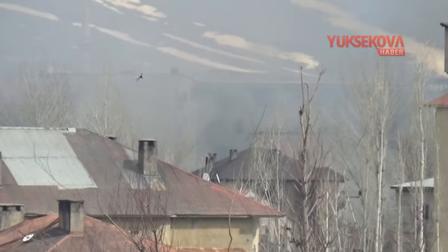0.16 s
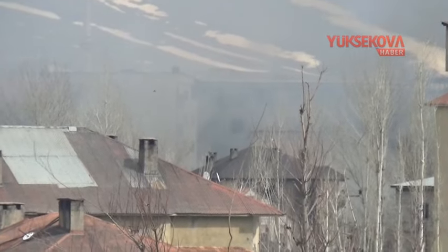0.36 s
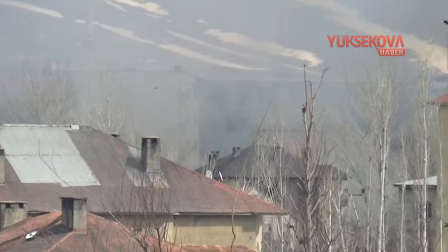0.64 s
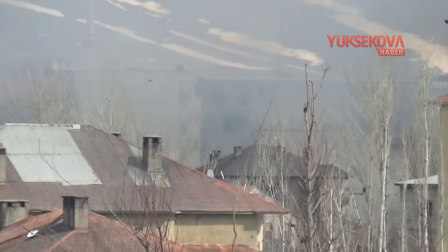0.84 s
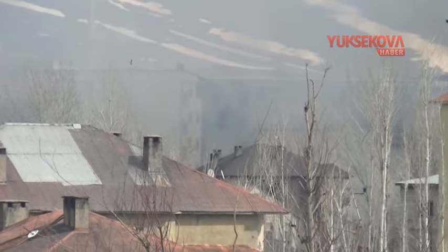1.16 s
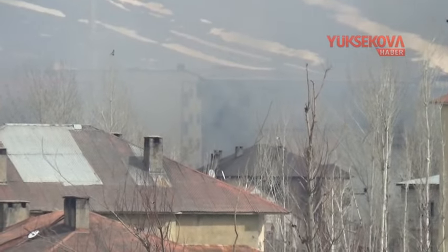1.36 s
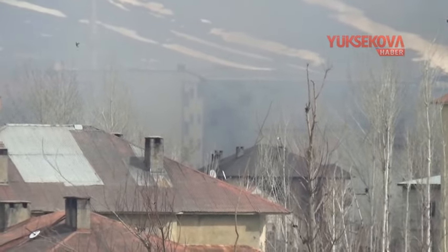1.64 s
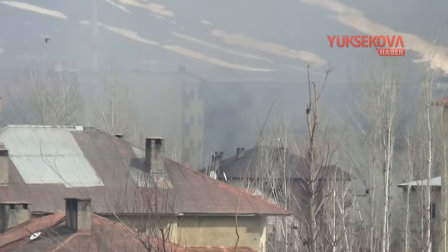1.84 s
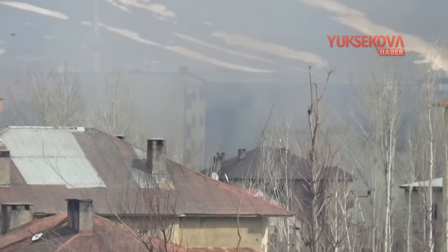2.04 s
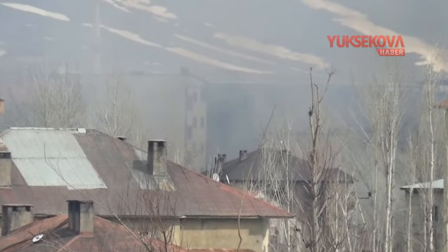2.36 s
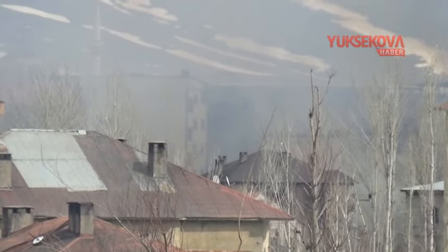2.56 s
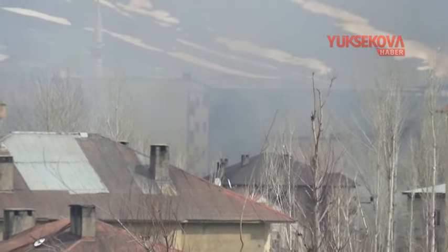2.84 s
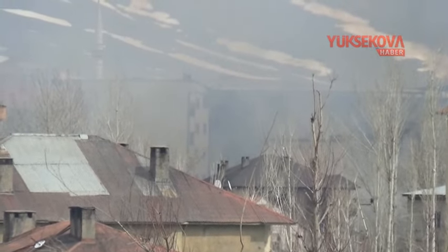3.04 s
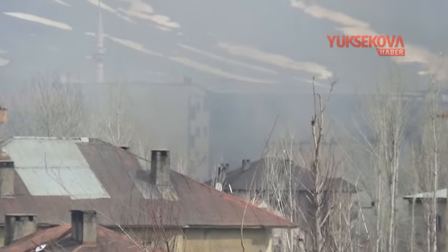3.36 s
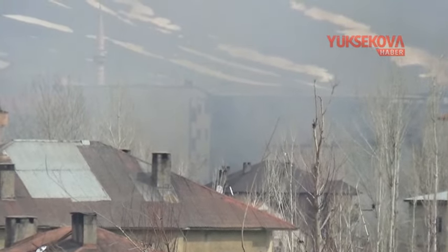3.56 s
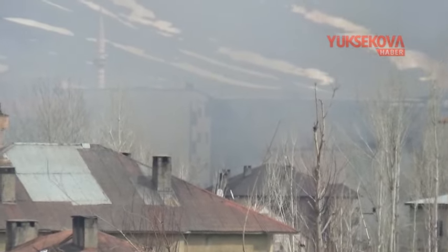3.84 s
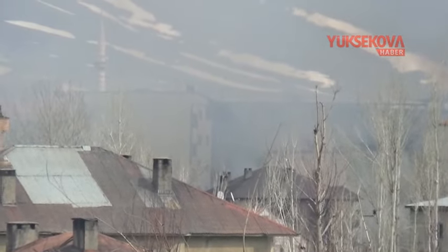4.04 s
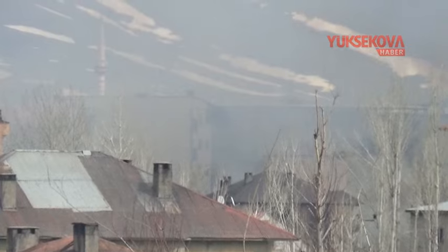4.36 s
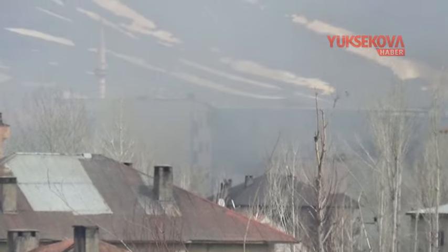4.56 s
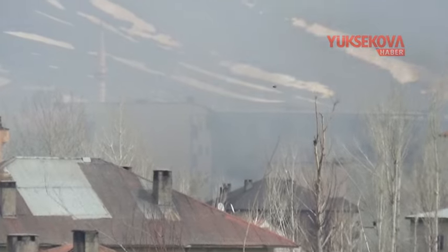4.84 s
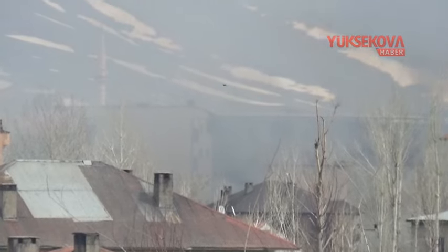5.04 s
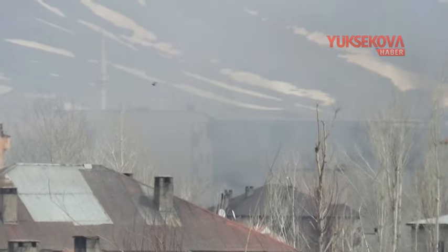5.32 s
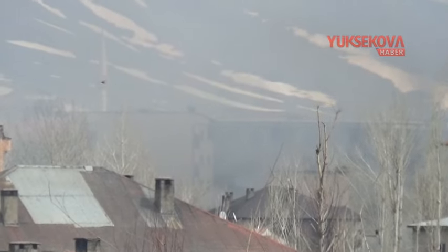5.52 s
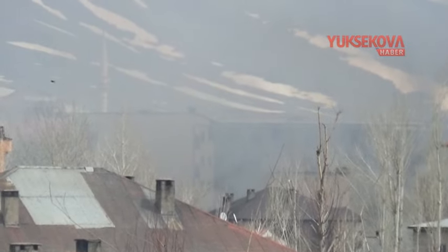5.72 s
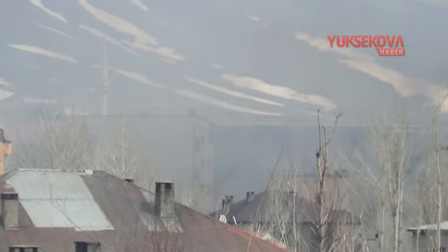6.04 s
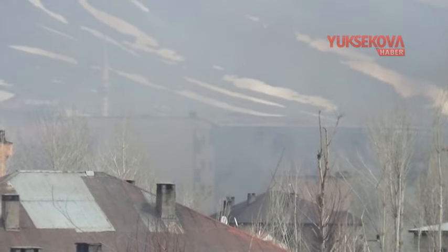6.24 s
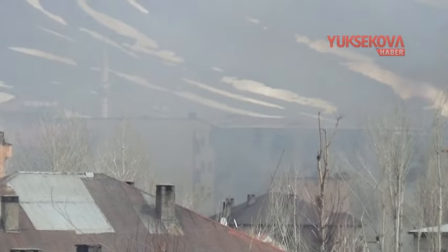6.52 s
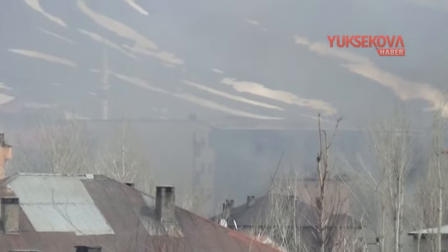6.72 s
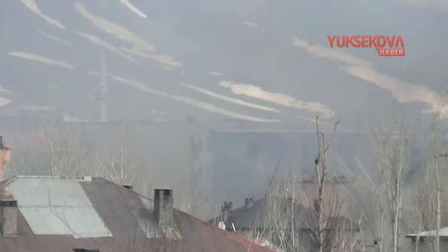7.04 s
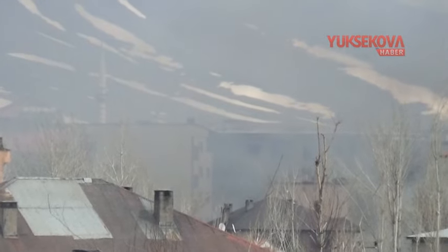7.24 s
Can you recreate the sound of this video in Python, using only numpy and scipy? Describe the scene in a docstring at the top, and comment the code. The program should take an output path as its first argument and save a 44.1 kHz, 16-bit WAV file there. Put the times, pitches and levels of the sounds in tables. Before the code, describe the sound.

The first second holds only a faint low town hum and steady hiss, with a couple of tiny dry clicks at about 0.2 to 0.3 s. At 1.15 s a heavy explosion strikes from some distance: a rapid chain of hard, low booms and wall echoes until about 2 s, with a brief overloaded crackle at 1.4 s. A thick, clattering roll over deep rumble spreads through the town and fades through 3.5 s, with soft late echoes. At 3.83 s a weaker, duller blast thuds several times and rolls away. At 5.34 s a stronger group of booms hits until 5.6 s, followed by lesser thuds around 6.05 and 6.3 s. A last boom lands at 7.3 s and is still rolling at the end. Close walls give a boxy colour, the left is louder, and the loudest peaks are compressed.

```python
"""Heavy explosions boom across a town, some way from the microphones, over a faint hum and hiss.
Each shock front is a sharp step with a cluster of random wall reflections and a softer, duller tail.
Houses and hillsides answer with long rolls: dense echoes of noise over a deep rumble.
A few short bursts of noise make small clicks. Close walls colour everything, the left side is louder,
and loud sound is turned down, with any peaks left beyond full scale cut flat."""
import sys
import numpy as np
from scipy import signal
from scipy.fft import rfft, irfft
from scipy.io import wavfile
from scipy.ndimage import uniform_filter1d

SR = 44100
rng = np.random.default_rng(int(sys.argv[2]) if len(sys.argv) > 2 else 0)


def unload_audio(sound):
    """Save the sound as a 16-bit wav file, at the path given as the first command line argument."""
    columns = np.transpose(np.atleast_2d(sound))
    # keep every value between -1 and 1, then stretch to whole-number steps
    steps = np.round(np.clip(columns, -1, 1) * 32767)
    wavfile.write(sys.argv[1], SR, steps.astype(np.int16))


N = 325458  # length in samples
SIZE = 8192  # length in samples of the spectra used for filtering
HZ = np.fft.rfftfreq(SIZE, 1 / SR)


def amp(db):
    """Turns decibels into a gain."""
    return 10 ** (np.asarray(db) / 20)


def unit(x):
    """Scales a sound to an rms of 1."""
    return x / np.sqrt(np.mean(x ** 2) + 1e-20)


def die_away(t, t60):
    """A gain that falls by 60 dB in t60 seconds."""
    return np.exp(-np.log(1000) * t / t60)


def read(points):
    """Joins the points of a spectrum by straight lines over log frequency."""
    hz, db = np.transpose(points)
    return np.interp(np.log(HZ + 1), np.log(hz + 1), db)


def shelf(hz):
    """Rises from 0 well below hz to 1 well above it."""
    return HZ ** 4 / (HZ ** 4 + hz ** 4)


def band(hz, octaves):
    """A flat-topped band around hz, in dB."""
    distance = np.log2((HZ + 1) / hz) / octaves
    return -20 * np.log10(1 + distance ** 4)


def add(mix, s, sound):
    """Mixes a sound in at s seconds."""
    part = mix[..., round(s * SR):][..., :sound.shape[-1]]
    part += sound[..., :part.shape[-1]]


def colour(x, db):
    """Filters with the given dB at each frequency, so that nothing rings before a hit."""
    # folding the cepstrum forward in time gives a minimum-phase filter
    cepstrum = irfft(np.log(amp(np.maximum(db, db.max() - 100))))
    cepstrum[1:SIZE // 2] *= 2
    cepstrum[SIZE // 2 + 1:] = 0
    response = irfft(np.exp(rfft(cepstrum)))[:SIZE // 2]
    return signal.oaconvolve(x, response)[:len(x)]


def echoes(count, per_s, spread_db):
    """A random train of reflections of either sign; spread_db sets how unequal they are."""
    chance, size, sign = rng.random((3, count))
    strength = amp(spread_db * np.minimum(-np.log(1 - size), 3))
    return unit((chance < per_s / SR) * np.sign(sign - .5) * strength)


# Spectrum of the town hum and the hiss.
# Each row: frequency in Hz, relative strength in dB per Hz.
AIR_SPECTRUM = [(35, -6), (65, -3), (100, 1.5), (170, -4), (250, -1), (370, -8), (520, -7.5), (700, -10.5),
                (900, -12.5), (1030, -5), (1200, -14.5), (1550, -14.5), (2000, -20.5), (4000, -21.5),
                (6300, -20), (10000, -25), (14000, -25)]


def air(level_db=-53.5, left_db=2.0, right_db=-1.5, apart=.55):
    """Low hum of the town and a steady hiss: filtered noise, mostly shared by both microphones."""
    shared, left, right = (unit(colour(rng.standard_normal(N), read(AIR_SPECTRUM))) for _ in range(3))
    on_left = amp(left_db) * unit(shared + apart * left)
    on_right = amp(right_db) * unit(shared + apart * right)
    return amp(level_db) * np.array([on_left, on_right])


# Small clicks: most are close to the microphones; the one at 1.409 is a bright crackle of overload.
# Each row: start in seconds, peak in dB before the microphones, centre in Hz, width in octaves,
# time to fall by 60 dB in seconds.
CLICK_EVENTS = [(.192, -40, 2480, 1.7, 0.013), (.207, -37.5, 2450, 0.68, .025),
                (.330, -40, 2440, 0.63, 0.016), (1.409, -26, 7740, 0.61, 0.013),
                (3.926, -40.5, 4950, 1.13, 0.01), (4.106, -45, 3000, 1.1, .015),
                (5.857, -41.5, 3000, 1.4, .015)]


def clicks():
    """Tiny dry snaps and one crackle: short bursts of noise kept to one band."""
    out, t = np.zeros(N), np.arange(SIZE) / SR
    for s, db, hz, octaves, t60 in CLICK_EVENTS:
        burst = rng.standard_normal(SIZE) * die_away(t, t60)
        snap = colour(burst, band(hz, octaves))
        add(out, s, amp(db) * snap / abs(snap).max())
    return out


# The broad colour that all the blasts share.
# Each row: frequency in Hz, relative strength in dB per Hz.
BLAST_SPECTRUM = [(25, -45), (70, -21), (140, -5.5), (250, -5), (450, -7), (800, -12), (1100, -20.5),
                  (1600, -32.5), (2100, -42.5), (2800, -58.5), (3500, -67), (4300, -87), (9000, -100)]


def blast(db, rise_s, t60, boom_hz, boom_db, thud_db, crack_db,
          tail_t60=0.84, tail_db=-4, boom_octaves=0.18, thud_hz=190, crack_hz=1200,
          absorbed_db=12, absorbed_hz=2400, front=0.47, front_lost_s=0.0043):
    """A shock front, its cluster of wall reflections and a softer tail, dulled by distance."""
    t = np.arange(SR) / SR
    cluster = unit(echoes(SR, per_s=1600, spread_db=0.5) * die_away(t, t60))
    tail = unit(echoes(SR, per_s=4200, spread_db=1.0) * die_away(t, tail_t60))
    tail = colour(tail, -absorbed_db * shelf(absorbed_hz))  # longer paths lose more treble
    # rough or distant walls smear an arrival, so that it swells up instead of striking
    train = (cluster + amp(tail_db) * tail) * np.minimum(t / rise_s, 1) ** 2
    # the sharp front itself: a slow rise smears it away
    train[0] += front * np.exp(-rise_s / front_lost_s) * np.sqrt(SR)
    # the reflections spread the energy in time but leave the broad colour to the blast itself
    power = uniform_filter1d(abs(rfft(train[:SIZE])) ** 2, size=21)
    broad_db = 10 * np.log10(power + 1e-9)
    boom = boom_db * np.exp(-.5 * (np.log2((HZ + 1) / boom_hz) / boom_octaves) ** 2)
    tilt = thud_db * (1 - shelf(thud_hz)) + crack_db * shelf(crack_hz)
    sound = colour(train, read(BLAST_SPECTRUM) + boom + tilt - broad_db)
    return amp(db) * unit(sound) * np.sqrt(.02)  # the level counts the energy as if within 20 ms


# The shock fronts and their distinct echoes.
# Each row: start in seconds, level in dB before the microphones, rise in seconds,
# time for the cluster to fall by 60 dB in seconds, boom centre in Hz, boom boost in dB,
# boost of the low thud in dB, boost of the high crack in dB.
BLAST_EVENTS = [(1.150, -7.5, 0.0014, 0.43, 252, 4, -5, 3.5), (1.180, -9.5, .001, 0.13, 230, 8, -1.5, 3),
                (1.214, -5.5, 0.0035, 0.49, 235.6, 9.5, -0.5, -2),
                (1.253, -7.5, 0.00083, 0.26, 240, 0, -5, 1.5), (1.319, -8, 0.0034, 0.37, 239, 11.5, 4, 8.5),
                (1.370, -10.5, 0.0012, 0.28, 230, 8.5, -1.5, 9.5),
                (1.488, -16, .0005, .09, 300, 0, -3.5, 8), (1.628, -12, 0.00096, 0.12, 285.3, 1.5, -3, -6),
                (1.658, -10, 0.0024, 0.21, 169, 13.5, 3, 0),
                (1.766, -10.5, 0.00055, 0.048, 249, 6, -2.5, -9),
                (1.796, -13.5, 0.0012, 0.12, 235, 6, -1, -1), (1.863, -14, .001, .09, 199, 16, 5, -3.5),
                (1.980, -9, 0.02, .2, 254, 6.5, 10.5, 9), (2.605, -25, 0.012, 0.12, 700, -4, -8, 1),
                (3.010, -25.5, 0.012, 0.53, 260, -0.5, -2, -13),
                (3.355, -34.5, .001, 0.043, 397, 16, -11, -10.5), (3.405, -25, 0.038, 0.45, 910, 9, -9, 4),
                (3.496, -20.5, 0.0043, .075, 363, 9.5, -9, -11),
                (3.834, -14, 0.0016, 0.085, 383, 6, -2.5, -2),
                (3.876, -18.5, 0.0017, 0.73, 268, 11.5, 8.5, 8.5),
                (3.960, -18.5, 0.0042, .12, 274, 14.5, -7, 2),
                (3.995, -17.5, 0.0012, 0.12, 280, 9.5, -6, -1),
                (4.003, -17, 0.00048, 0.085, 273, 13.5, 5, 4), (4.010, -21, 0.00078, 0.24, 800, 8, 6.5, 6),
                (4.585, -30, 0.0075, 0.13, 288, 14, -13, -16), (4.610, -28, .0005, .03, 876, 11.5, -5, -2),
                (5.015, -31, .002, 0.19, 262, 5.5, 9, -10.5),
                (5.341, -11.5, .0005, 0.23, 267, 12.5, 5.5, -2.5),
                (5.366, -20, 0.00092, 0.3, 287, 12, 5, 1), (5.466, -15, 0.0091, .12, 270, 8, 3, 8),
                (5.489, -10.5, 0.00031, 0.064, 530, 5.5, 1.5, 5.5),
                (5.498, -13.5, 0.00068, 0.043, 255, 9, 5.5, 1.5),
                (5.519, -10.5, .001, 0.21, 272, 4.5, 5.5, 3), (5.595, -19.5, .002, 0.47, 151, 8, 12.5, 11),
                (6.054, -21.5, 0.0082, 0.15, 282, 18, 13, 3),
                (6.316, -17.5, 0.0048, 0.19, 258, 17, 9, 10.5), (7.000, -38, 0.012, 0.16, 480, 3, -8, 8),
                (7.298, -13.5, 0.0036, 0.15, 207, 12, -2.5, 5), (7.353, -21, 0.0021, 0.16, 215, 9, 2.5, 3)]


def blasts():
    """All the shock fronts and distinct echoes in turn."""
    out = np.zeros(N)
    for s, *row in BLAST_EVENTS:
        add(out, s, blast(*row))
    return out


def surges(t, depth_db=1.0, lump_s=.05):
    """A random gain, newly drawn every lump_s, as echoes bunch up and thin out."""
    chance = rng.standard_normal(400)
    return amp(depth_db * np.interp(t / lump_s, np.arange(len(chance)), chance))


# Spectrum of the dull thuds that make up the body of a roll.
# Each row: frequency in Hz, relative strength in dB per Hz.
BODY_SPECTRUM = [(50, -42.5), (100, -7), (150, -4), (220, 3), (290, 0.5), (400, -3), (520, -13.5),
                 (900, -66)]
# Spectrum of the harder clatter in a roll.
# Each row: frequency in Hz, relative strength in dB per Hz.
CLATTER_SPECTRUM = [(250, -30.5), (400, 2), (550, 2.5), (820, -1), (1050, -4.5), (1400, -15), (1700, -21),
                    (2000, -31.5), (2500, -44), (3500, -75.5)]


def roll(s, swell_s, db, fade_db_per_s, clatter_db, deep_db, deep_fade_db_per_s, deep_hz, rasp_db,
         body_db=0.43, hard_db=0.72, rasp_hz=2050, rasp_octaves=0.43, rasp_t60=6,
         left_db=5, right_db=-3, opposed=0.35, swell_power=1.6,
         hill_delay_s=2.2, hill_spread_s=0.8, hill_db=-20.5, hill_clatter_db=-3.5):
    """Countless echoes from the town, each a dull thud with a harder clatter, over a deep rumble."""
    t = np.arange(N - round(s * SR)) / SR
    # ever more walls answer as the shock spreads
    level = amp(db) * np.minimum(t / swell_s, 1) ** swell_power * surges(t)
    age = np.maximum(t - swell_s, 0)
    fade = amp(-fade_db_per_s * age)
    # the hillsides return each roll late, smeared and without its deep rumble
    hills = amp(hill_db) * np.exp(-.5 * ((t - hill_delay_s) / hill_spread_s) ** 2)
    body = level * np.hypot(fade, hills)
    clatter = level * amp(clatter_db) * np.hypot(fade, amp(hill_clatter_db) * hills)
    deep = level * amp(deep_db - deep_fade_db_per_s * age)

    train = echoes(N, per_s=3500, spread_db=2.0)[:len(t)]
    near = amp(body_db) * body * unit(colour(train, read(BODY_SPECTRUM)))
    near += amp(hard_db) * clatter * unit(colour(train, read(CLATTER_SPECTRUM)))
    # later echoes have travelled further, so the air has absorbed their rasping top
    absorbed_db = 60 * t / rasp_t60
    rasp = colour(echoes(N, per_s=4000, spread_db=-0.5)[:len(t)], band(rasp_hz, rasp_octaves))
    near += amp(rasp_db - absorbed_db) * clatter * unit(rasp)

    # the microphones' processing leaves the deep rumble partly in opposite phase between left and right
    deep_band = band(deep_hz, octaves=0.61)
    a, b = (unit(colour(rng.standard_normal(N)[:len(t)], deep_band)) for _ in range(2))
    rumble = np.array([amp(left_db) * a, amp(right_db) * unit(b - opposed * a)])
    return microphones(near) + deep * rumble


# The rolls of echoes that the explosions set off.
# Each row: start in seconds, swell in seconds, level in dB before the side gains, fade in dB per second,
# clatter in dB against the level, deep rumble in dB against the level, fade of the deep rumble
# in dB per second, its centre in Hz, rasp in dB against the clatter.
# The body and clatter get a small lift, and the rumble its own gain on each side, in roll().
ROLL_EVENTS = [(1.150, .19, -16, 15, 0.5, -1.5, 18.5, 75.7, -33.5),
               (3.834, 0.025, -32.5, 10.5, -4.5, -11, 22.5, 119, -33),
               (5.341, .15, -27.5, 16.5, -5, -1, 23.5, 111, -25),
               (6.318, 0.027, -37, 20, -4, -1, 30, 117, -22),
               (7.299, 0.042, -39.5, 19, -4, -1, 27, 100, -28)]


def rolls():
    """The rolls overlap, each still dying away under the next."""
    out = np.zeros((2, N))
    for s, *row in ROLL_EVENTS:
        add(out, s, roll(s, *row))
    return out


def microphones(x, left_db=2.7, right_db=-3.2, scatter_db=-19, scatter_t60=.06, shade_db=2.0, shade_hz=680):
    """The right is quieter and shaded in the middle range; close walls make the sides differ slightly."""
    t = np.arange(SIZE) / SR
    walls = rng.standard_normal(SIZE) * die_away(t, scatter_t60)
    side = amp(scatter_db) * signal.oaconvolve(x, walls / np.linalg.norm(walls))[:len(x)]
    shaded_db = right_db - shade_db * amp(band(shade_hz, octaves=0.19))
    return np.array([amp(left_db) * (x + side), colour(x - side, shaded_db)])


# Peaks and dips from the walls around the microphones, which colour each direction differently.
# Each row: centre in Hz, width in Hz, dB towards the first blast, dB towards the later ones.
NOOK_PEAKS = [(85.5, 14, 3, -3.5), (155.7, 8.7, 5, -0.5), (215, 13, 4.5, 5.5), (245, 36, 2.5, -1),
              (297.4, 20, 5.5, 3.5), (345.4, 18.5, 4.5, -0.5), (394, 30, -0.5, 0), (463, 66, -3.5, -5.5),
              (547, 120, -0.5, 1), (581, 20, 0.5, -4), (750.6, 18, 1.5, -9), (846, 67, 1, 3),
              (936, 116, -7, -3), (1005, 170, 4, -1), (1137, 100, -3.5, -3.5), (1274, 38, 4, 5.5),
              (1407, 41, -8, -12.5), (1472, 154, 2, 9)]


def nook(pair, direction):
    """Adds the peaks and dips that close walls give to direction 0 (first blast) or 1 (later ones)."""
    db = sum(row[2 + direction] / (1 + (2 * (HZ - row[0]) / row[1]) ** 2) for row in NOOK_PEAKS)
    return np.array([colour(channel, db) for channel in pair])


def scene(turn_s=3.4):
    """Blasts, clicks, rolls and town air, all coloured by the walls around the microphones."""
    booms = microphones(blasts() + clicks()) + rolls()
    # by turn_s the first blast has died down; the later ones take over within 0.1 s
    later = np.clip((np.arange(N) / SR - turn_s) * 10, 0, 1)
    return nook(booms * (1 - later) + air(), 0) + nook(booms * later, 1)


def record(dry, threshold_db=-14, squeeze=0.42, recovery_db_per_s=5.5, lag_s=.03, edge_hz=14200):
    """Gentle gain control, hard clipping at full scale, then a cut of the highest treble."""
    power_db = 10 * np.log10(abs(uniform_filter1d((dry ** 2).mean(0), size=900)) + 1e-12)
    # the loudness is held at its peaks and sinks slowly after them
    fall = np.arange(N) * recovery_db_per_s / SR
    held_db = np.maximum.accumulate(power_db + fall) - fall
    over_db = np.maximum(held_db - threshold_db, 0)
    # the gain lags behind, so shock fronts get through
    lag = np.exp(-1 / (lag_s * SR))
    gain = amp(-squeeze * signal.lfilter([1 - lag], [1, -lag], over_db))
    clipped = np.clip(dry * gain, -1, 1)
    edge = signal.firwin(511, edge_hz, window=("kaiser", 9), fs=SR)
    return signal.oaconvolve(clipped, edge[None], "same")


dry = scene()
out = record(dry)
unload_audio(out)
```